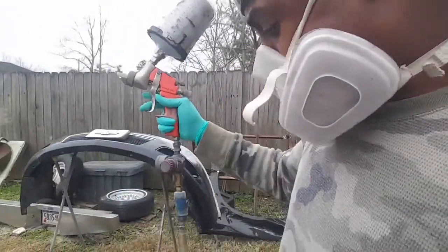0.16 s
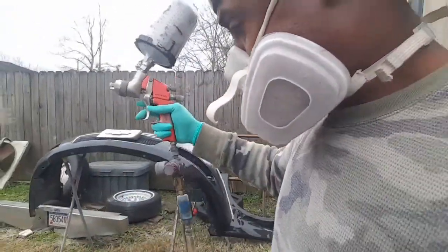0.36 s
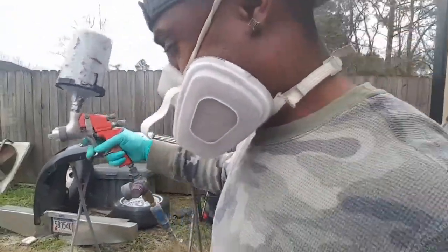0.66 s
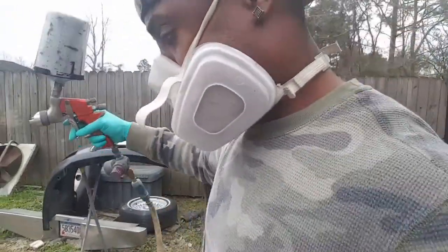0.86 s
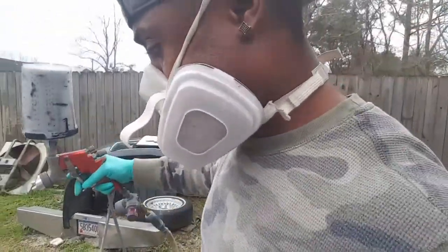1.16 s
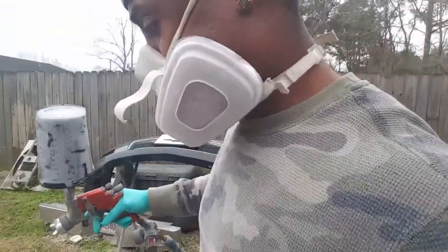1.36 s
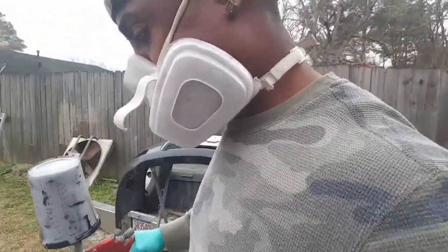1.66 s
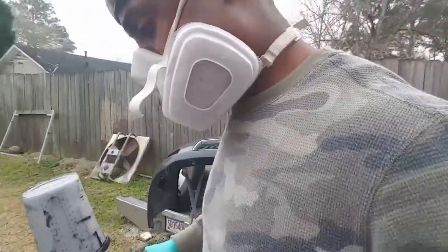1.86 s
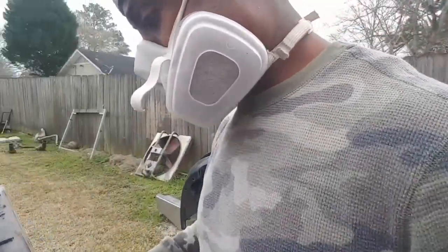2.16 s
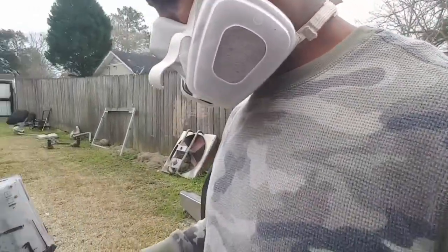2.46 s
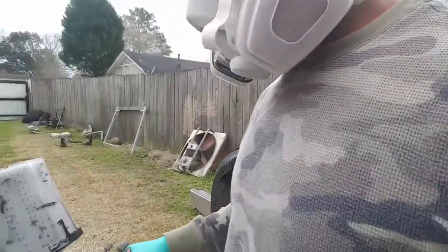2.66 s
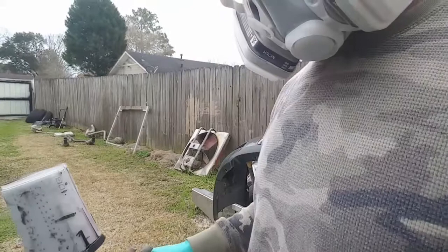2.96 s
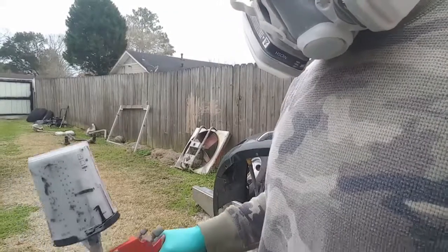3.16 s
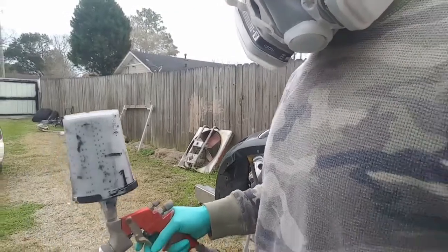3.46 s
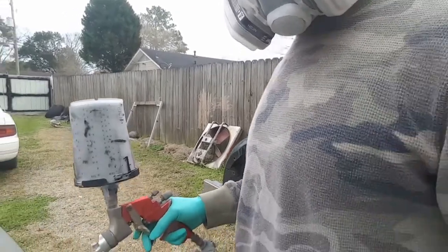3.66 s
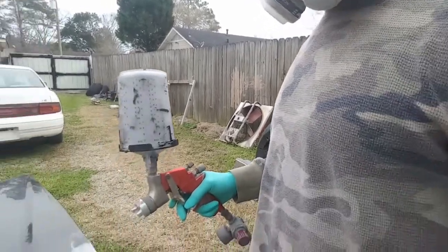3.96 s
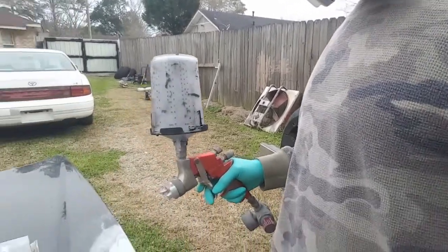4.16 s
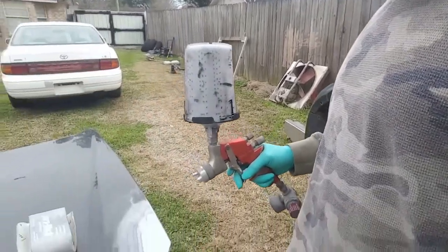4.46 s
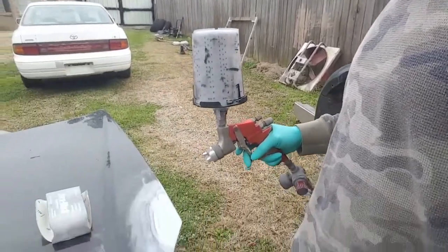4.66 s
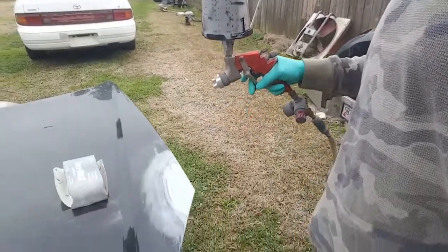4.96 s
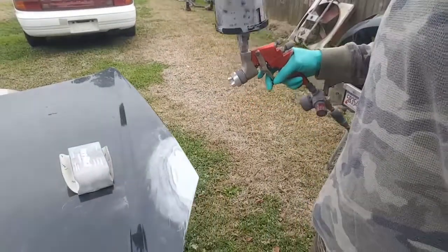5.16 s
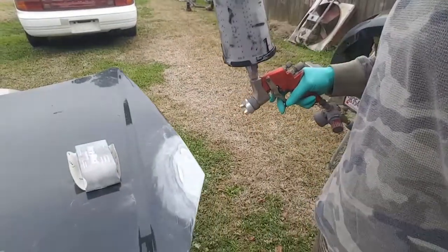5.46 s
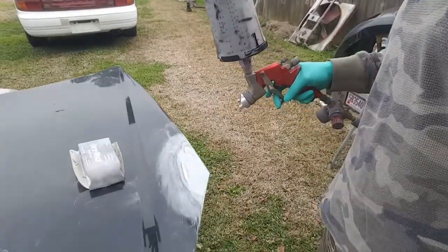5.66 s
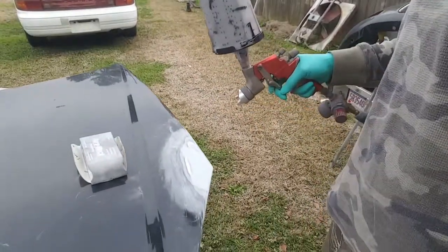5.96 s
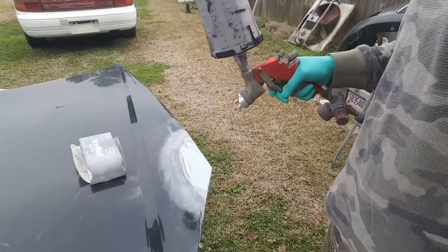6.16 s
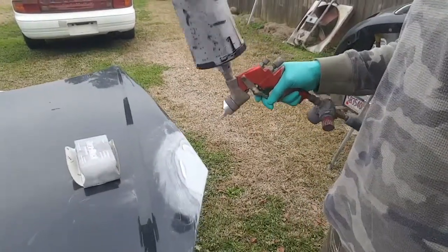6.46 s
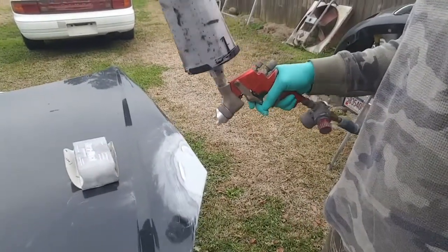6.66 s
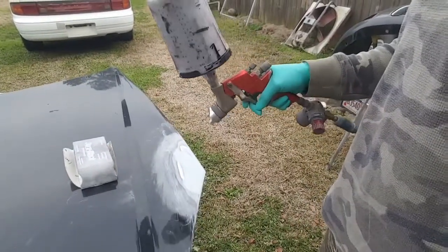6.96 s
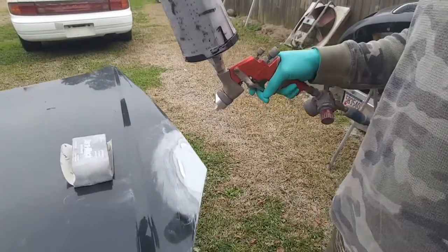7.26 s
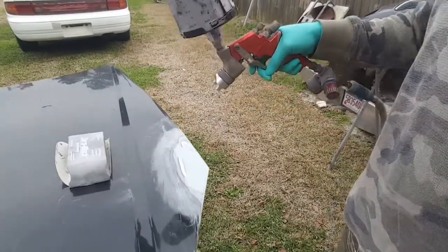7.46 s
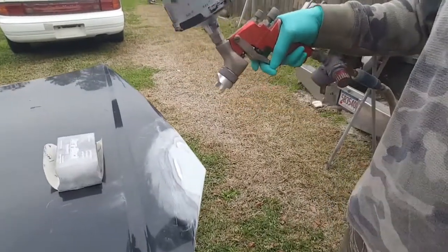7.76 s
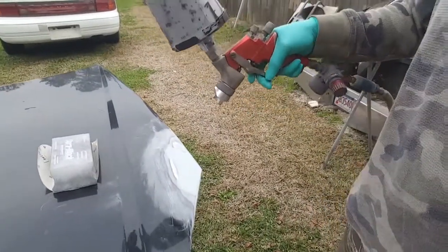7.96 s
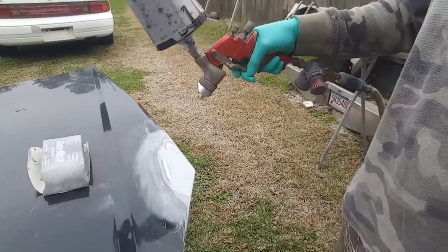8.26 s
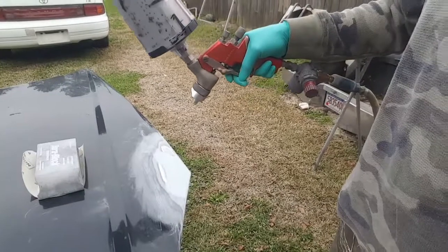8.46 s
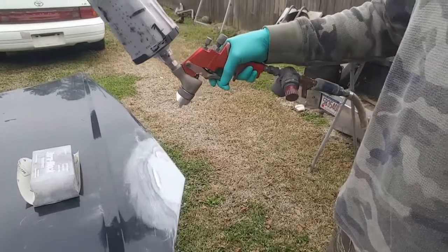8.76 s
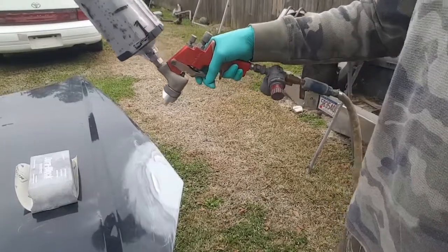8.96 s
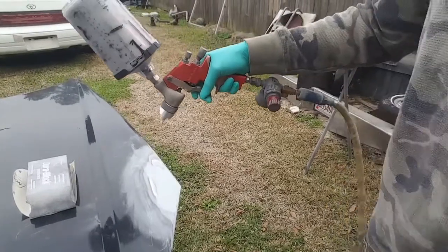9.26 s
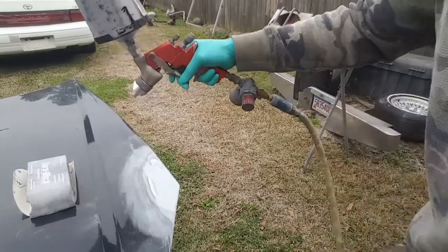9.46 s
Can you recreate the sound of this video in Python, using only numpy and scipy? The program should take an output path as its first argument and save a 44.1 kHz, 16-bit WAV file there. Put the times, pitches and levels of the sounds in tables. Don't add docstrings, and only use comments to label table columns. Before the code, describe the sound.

Close stereo pickup outdoors: small clicks, rustling and a sheet-metal clank over a leaking air hose, then a spray gun fires for about half a second. The leak returns with pipe knocks and a faint scrape. A longer spray of a second and a half follows, tapers off, pauses, then another rushing hiss lasts nearly to the end. Low distant traffic hum remains underneath.

```python
import sys
import numpy as np
from scipy import signal
from scipy.fft import rfft, irfft, next_fast_len
from scipy.io import wavfile
from scipy.ndimage import map_coordinates

SR = 44100
rng = np.random.default_rng(int(sys.argv[2]) if len(sys.argv) > 2 else 0)


def wav_out(sig):
    wavfile.write(sys.argv[1], SR, np.round(np.clip(np.atleast_2d(sig).T, -1, 1) * 32767).astype(np.int16))


def boost(x):
    u = np.asarray(x, float) / 20
    return 10 ** u


N = 423801
SIZE = next_fast_len(N)
HZ = np.arange(1, SIZE // 2 + 2) * SR / SIZE

# opens/s, shuts/s, jet level/dB, low part over jet/dB, left-right/dB
TRIGGER_PULLS = [
    (2.255, 2.304, -55.5, 12.5, -5.5),
    (2.292, 2.889, -32, -3, -8),
    (6.246, 7.798, -30.5, -6.5, -7),
    (7.793, 7.978, -40.5, -6.5, -8),
    (8.377, 9.7, -30.5, -7, -8),
]
OPEN_S, VALVE_CURVE = 0.03, 1.5
# t/s, delay/ms
LEAK_DELAY = [(0, 0.048), (.9, 0.11), (1.7, 0.061), (3, -0.029), (3.8, -0.023), (4.25, -0.074),
              (4.5, -0.13), (5.25, -0.15), (5.6, -0.2), (6.2, -0.19), (8, -0.21)]
# f/Hz, likeness 0-1
YARD_ALIKE = [(30, .6), (80, .95), (150, .97), (400, .85), (1400, .75), (3000, .75), (5000, .75),
              (7000, .5), (14000, .3)]
# f/Hz, left-right/dB
YARD_SIDES = [(60, -5), (110, -5), (200, -9.5), (380, -7.5), (700, -6.5), (1290, -5), (2380, -8.5),
              (4400, -5), (8120, -3.5), (15000, -3.5)]
# f/Hz, level/dB, time to fade by 60 dB/s
PIPE_MODES = [(350.6, -1.5, 0.35), (389.5, -5.5, 0.26), (579, -15.5, 0.3), (703, -1.5, 0.17)]


def rms_one(x):
    return x / np.sqrt(np.mean(np.atleast_2d(x).mean(axis=0) ** 2) + 1e-20)


def in_time(tables):
    t = np.arange(N) / SR
    s, *columns = np.transpose(np.concatenate(tables))
    return [np.interp(t, s, column) for column in columns]


def at_hz(points):
    hz, value = np.transpose(points)
    return np.interp(np.log(HZ), np.log(hz), value)


def drift(rate):
    hop = 40
    r = np.exp(-2 * np.pi * rate * hop / SR)
    slow = signal.lfilter([1], [1, -2 * r, r * r], rng.standard_normal(N // hop + 4002))[4000:]
    slow = (slow - slow.mean()) / slow.std()
    return np.interp(np.arange(N) / hop, np.arange(len(slow)), slow)


def panned(x, db):
    return x * boost(np.array([[0.5], [-0.5]]) * db)


def left_late(x, lag_ms):
    lag = np.interp(np.arange(N) / SR, *np.transpose(lag_ms)) * SR / 1000
    left = map_coordinates(x[0], [np.arange(N) - lag], order=3, mode="nearest")
    return np.array([left, x[1]])


def stereo_noise(colour_db, likeness, balance):
    one, other = rfft(rng.standard_normal((2, SIZE)))
    alike = np.clip(at_hz(likeness), 0, 1)
    right = alike * one + np.sqrt(1 - alike ** 2) * other
    return panned(boost(colour_db) * np.array([one, right]), at_hz(balance))


def bands(spectra, edges, levels_db, patchy_db, rate):
    out, together = 0, drift(rate)
    below = [1 / (1 + (HZ / hz) ** 24) for hz in edges]
    for low, high, db in zip(below, below[1:], levels_db):
        share = np.sqrt(np.maximum(high - low, 0))
        band = rms_one(irfft(spectra * share, SIZE)[:, :N])
        out = out + band * boost(db + patchy_db * (together + drift(rate)))
    return out


def patches(x, depth_db, wide_hz, long_s):
    hz, s, frames = signal.stft(x, SR, nperseg=1024)
    coarse = rng.standard_normal((60, 120))
    places = np.meshgrid(hz / wide_hz, s / long_s, indexing="ij")
    field = map_coordinates(coarse, places, order=3, mode="wrap")
    return signal.istft(frames * boost(depth_db * field), SR, nperseg=1024)[1][:, :N]


def stages(rows, rise_s, fall_s, curve):
    t = np.arange(N) / SR
    return np.array([np.interp(t, [a, a + rise_s, b, b + fall_s], [0, 1, 1, 0]) ** curve
                     for a, b in rows])


def ring(clicks, hz, t60):
    r, w = boost(-60 / (t60 * SR)), 2 * np.pi * hz / SR
    return signal.lfilter([0, np.sin(w)], [1, -2 * r * np.cos(w), r * r], clicks + 1e-18)


def yard():
    # f/Hz, level per Hz/dB
    yard_colour = [(20, -21), (50, -7), (90, -3.5), (150, 2.5), (175, -4), (215, -15.5), (270, -12),
                   (320, -9.5), (450, -9.5), (900, -13.5), (1100, -12.5), (2000, -16.5), (3500, -24.5)]
    t = np.arange(N) / SR
    stir_ends_s, settle_s = 1.37, 0.42
    stir_db = 5.5 * np.clip(1 - (t - stir_ends_s) / settle_s, 0, 1)
    traffic_db, middle_db, rustle_db = -60.5 - 0.08 * t, -66 + stir_db, -63 + 0.46 * stir_db
    air = stereo_noise(at_hz(yard_colour), YARD_ALIKE, YARD_SIDES)
    return bands(air, [15, 220, 900, 3000], [traffic_db, middle_db, rustle_db], patchy_db=0.9, rate=7.0)


def ticks():
    # t/s, peak level/dB, pitch f/Hz, time to fade by 60 dB/s, left-right/dB
    small_knocks = [(0.054, -35.5, 640, 0.076, -8), (0.115, -41, 780, 0.036, -9),
                    (.14, -39.5, 368, 0.081, -7), (0.166, -45, 800, 0.047, -7),
                    (0.301, -42, 480, 0.022, -7), (.42, -48, 500, 0.033, -3),
                    (0.48, -33.5, 1380, 0.013, -6), (0.483, -37, 4300, .01, -8),
                    (0.544, -38, 1130, 0.067, -5), (.56, -42, 2500, 0.042, -13),
                    (.585, -43, 900, 0.023, -3), (0.76, -37.5, 870, 0.018, -4),
                    (1.75, -48.5, 172, 0.66, -9), (3.705, -54, 700, .02, -9), (4.13, -49, 170, 0.083, -7),
                    (4.758, -54, 450, .04, -5), (5.57, -49, 2000, .02, -5), (5.927, -41, 2070, 0.023, -9)]
    blow_cracks = [(0.532, -44, 1800, 0.27, -8), (0.534, -48, 3500, 0.2, -7), (1.15, -38, 260, .45, -4),
                   (1.151, -37, 350, 1.1, -4), (1.152, -35, 526, 0.25, -4), (1.153, -36, 800, 0.85, -4),
                   (1.155, -46, 1500, 0.11, -4), (3.783, -47, 1100, 0.15, -7), (3.784, -48, 240, 0.05, -3),
                   (3.785, -49, 2400, 0.2, -9)]
    length = 24000
    out, t = np.zeros((2, N)), np.arange(length) / SR
    for s, db, hz, t60, pan_db in small_knocks + blow_cracks:
        burst = rng.standard_normal(length) * boost(-60 * t / t60)
        sound = ring(np.diff(burst, prepend=0), hz, 4.0 / hz)
        start = round(s * SR)
        out[:, start:start + length] += panned(boost(db) * sound / np.abs(sound).max(), pan_db)
    return out


def struck(modes, hits, spread_db, damping, rattle_s):
    at, out, length = [round(s * SR) for s, db in hits], 0, 6000
    chance = rng.standard_normal((len(hits), len(modes)))
    fade = boost(-60 * np.arange(length) / SR / rattle_s)
    for k, (hz, level_db, t60) in enumerate(modes):
        clicks = np.zeros(N)
        clicks[at] = boost(np.array(hits)[:, 1] + level_db + spread_db * chance[:, k])
        rattle = rng.standard_normal(length) * fade
        turning = np.exp(2j * np.pi * hz * np.arange(length) / SR)
        rattle /= np.abs(np.sum(rattle * turning))
        out = out + ring(signal.oaconvolve(clicks, rattle)[:N], hz, damping * t60)
    return out


def stand():
    # f/Hz, level/dB, time to fade by 60 dB/s
    stand_modes = [(295, -7.5, 0.98), (345, -3, 1), (383, -7, 0.71), (475, -6, .3), (516, 4.5, 0.22),
                   (623, -12, 0.76), (681, 2, 0.27), (765, -5.5, 1), (851, -0.5, 0.63), (920, -8, 0.43),
                   (1056, -7, 0.28), (1152, -13, 0.38), (1460, -17, .3)]
    # t/s, level/dB
    stand_blows = [
        (1.151, -37.5),
        (1.176, -43),
        (1.2, -43.5),
        (1.216, -45),
        (1.24, -47),
        (1.29, -48.5),
    ]
    return struck(stand_modes, stand_blows, spread_db=3.0, damping=0.55, rattle_s=0.02)


def pipe():
    # t/s, level/dB
    pipe_blows = [
        (2.261, -50.5),
        (2.312, -35.5),
        (2.35, -34.5),
        (3.788, -41.5),
        (3.822, -44.5),
        (3.9, -53.5),
        (3.975, -58.5),
    ]
    return struck(PIPE_MODES, pipe_blows, spread_db=4.0, damping=0.7, rattle_s=0.044)


def strokes(rows):
    s, length, db = np.transpose(rows)
    return boost(db) @ stages(zip(s, s + length), rise_s=0.054, fall_s=0.15, curve=1.46)


def rubbing():
    # t/s, length/s, level/dB
    leg_drags = [
        (.08, 0.062, -59),
        (.85, 0.35, -54.5),
    ]
    # t/s, length/s, level/dB
    pipe_slides = [
        (4.82, 0.33, -59.5),
        (4.89, 0.12, -50.5),
    ]
    # f/Hz, width/Hz, level/dB
    leg_modes = [(2120, 37, -3), (2500, 310, -2), (3540, 69, -2.5), (3940, 44, -1.5), (4170, 24, -1.5)]
    grit = rng.standard_normal(N) * boost(1.9 * drift(27))
    leg_sound = sum(boost(db) * rms_one(ring(grit, hz, 3.8 / width)) for hz, width, db in leg_modes)
    lowest_hz = PIPE_MODES[0][0]
    pipe_sound = rms_one(ring(ring(rng.standard_normal(N), lowest_hz, 0.1), lowest_hz, 0.16))
    return strokes(leg_drags) * boost(-3) * leg_sound + strokes(pipe_slides) * pipe_sound


def fence(x):
    out, dull = np.zeros((2, N)), signal.lfilter([0.3], [1, -0.7], x)
    lags = (rng.uniform(0.0071, 0.12, 12) * SR).astype(int)
    for k, lag in enumerate(lags):
        out[k % 2, lag:] += boost(-90 * lag / SR) * dull[:-lag] * (-1) ** (k // 2)
    return out


def metal():
    dry_metal = stand() + pipe() + rubbing()
    dry_metal = signal.sosfilt(signal.butter(4, 239, "high", fs=SR, output="sos"), dry_metal)
    return panned(dry_metal + boost(-15) * fence(dry_metal), -7.0)


def leak():
    # t/s, whistles level/dB, upper whistle's part/dB, clear path past body/dB
    leak_changes = [
        [(0, -52, -22, 1.5), (.41, -53, -9, 5), (.69, -54, -18, 4), (1.27, -53, -2.5, -1.5),
         (1.6, -58, -0.5, -2), (1.9, -61, 0.5, -2.5), (2.22, -59, -0.5, -2), (2.97, -53.5, -0.5, 1.5),
         (3.38, -55.5, 0.5, -2), (3.93, -52, -1, -.5), (4.16, -56.5, -2, -2.5), (4.3, -56, 1, -2),
         (4.7, -55.5, -1, 1.5), (5.26, -56.5, 1, 2.5), (5.55, -62, -1, 0.5), (6.21, -52, -1, 1.5),
         (8.06, -53, 2.5, 4.5), (8.33, -51, -1, 5)],
    ]
    # f/Hz, level per Hz/dB
    leak_colour = [(1500, -40), (2500, -6.5), (5000, -11), (5800, -4), (6550, 4), (7100, -3.5), (7750, -1),
                   (8500, -7.5), (9400, -17.5), (10500, -14.5), (12000, -18.5), (15400, -18)]
    whistles_db, upper_part_db, clear_db = in_time(leak_changes)
    lower_part_db = 10 * np.log10(np.clip(1 - boost(2 * upper_part_db), 0.03, 1))
    levels_db = [-61.5 + clear_db,
                 whistles_db + lower_part_db,
                 whistles_db + upper_part_db,
                 -63 + 0.31 * clear_db]
    air = stereo_noise(at_hz(leak_colour), YARD_ALIKE, YARD_SIDES)
    hiss = bands(air, [2640, 5430, 7050, 9050, 17000], levels_db, patchy_db=0.45, rate=12)
    hiss = patches(hiss, depth_db=0.6, wide_hz=700, long_s=0.3565)
    pan_db = -10.5 - 10.5 * np.interp(np.arange(N) / SR, *np.transpose(LEAK_DELAY))
    full_pulls = np.array(TRIGGER_PULLS)[1:, :2]
    blowing = stages(full_pulls, OPEN_S, fall_s=0.072, curve=VALVE_CURVE).max(axis=0)
    return boost(-23 * blowing) * panned(hiss, pan_db + 7.5)


def nozzle_db():
    # f/Hz, width/Hz, boost/dB
    resonances = [(3470, 190, 1), (3780, 510, -5.5), (4720, 570, 1.5), (6660, 700, 4.5), (7810, 550, 4.5),
                  (8870, 440, -3), (11420, 1100, 3.5)]
    return sum(db / (1 + (2 * (HZ - hz) / width) ** 2) for hz, width, db in resonances)


def gun():
    # t/s, nearness of nozzle/dB, squareness of the jet on the panel/dB
    wrist_sweeps = [
        [(2.3, 0, -8), (2.53, 1.5, -6.5), (2.667, -2, 5), (2.73, 1, -4), (2.85, -0.5, -2)],
        [(6.3, 1, 1.5), (6.58, 1.5, 2), (6.65, 0.5, 7.5), (6.98, 0.5, -1.5), (7.05, 2.5, -0.5), (7.12, 0, -1.5),
         (7.5, 0, 1.5), (7.7, .5, -2.5), (7.8, 0.5, -13.5)],
        [(8.4, 1, 1), (8.84, 0, 5.5), (9.16, 0, 5), (9.45, .5, 8.5), (9.54, 1, -8)],
    ]
    # f/Hz, level per Hz/dB
    jet_colour = [(40, -29), (65, -18), (100, -0.5), (140, -3), (200, -5), (357, -0.5), (430, -8),
                  (618, -16), (1670, -9), (4300, -4), (5520, -3), (7620, -2.5), (9780, -8), (15300, -6)]
    # f/Hz, likeness 0-1
    jet_alike = [(60, .97), (300, .96), (700, .87), (1400, .78), (3000, .62), (6000, .47), (9000, .47),
                 (14000, .28)]
    # f/Hz, left-right/dB
    jet_sides = [(60, -6.5), (200, -5.5), (700, -5.5), (1300, -3), (2400, -3), (4400, -8.5), (8100, -5.5),
                 (15000, -8.5)]
    # t/s, left delay/ms
    gun_delay = [(2.3, 0.17), (2.9, .17), (6.2, -0.068), (7.2, -0.0091), (7.7, -0.036), (8.7, 0.027),
                 (9.6, 0.06)]
    opens, shuts, jet_db, skirt_db, pan_db = np.transpose(TRIGGER_PULLS)[:, :, None]
    valve = stages(np.hstack([opens, shuts]), OPEN_S, fall_s=0.029, curve=VALVE_CURVE)
    surge_db = 2.5 * np.exp(-np.abs(np.arange(N) / SR - opens - OPEN_S) / 0.12)
    near_db, square_db = in_time(wrist_sweeps)

    def flow_db(extra_db):
        flow = np.sum(valve * boost(jet_db + extra_db), axis=0)
        return 20 * np.log10(flow + 1e-9) + near_db

    core_db = flow_db(surge_db)
    low_db = flow_db(surge_db + skirt_db)
    top_db = flow_db(0.6 * surge_db - 2.5)
    wash_db = core_db - 20.5 + square_db
    deep_db = wash_db - 0.25 * square_db + 0.5
    air = stereo_noise(at_hz(jet_colour) + nozzle_db(), jet_alike, jet_sides)
    hiss = bands(air, [600, 3800, 9000, 17000], [low_db, core_db, top_db], patchy_db=0.4, rate=17.0)
    wash = bands(air, [20, 200, 600], [deep_db, wash_db], patchy_db=1.5, rate=14.6)
    jet = patches(hiss, depth_db=1.0, wide_hz=640, long_s=0.3) + wash
    strongest = valve.argmax(axis=0)
    return panned(left_late(jet, gun_delay), pan_db[strongest, 0] + 6.5)


def scene():
    around = left_late(leak() + yard(), LEAK_DELAY)
    return around + ticks() + metal() + gun()


def roll_off(x):
    return signal.sosfilt(signal.butter(12, 15530, fs=SR, output="sos"), x)


def record(dry):
    spectra = rfft(dry, SIZE) * (HZ < 15500)
    return roll_off(irfft(spectra, SIZE)[:, :N])


dry = scene()
out = record(dry)
wav_out(out)
```